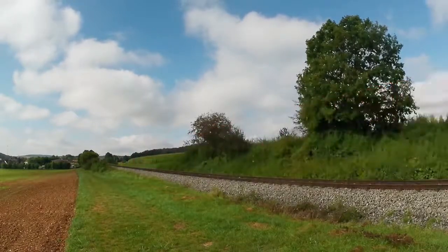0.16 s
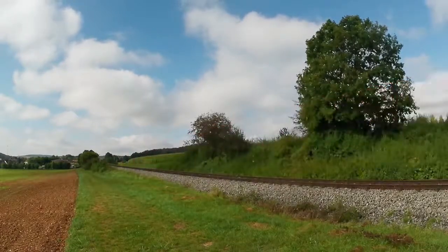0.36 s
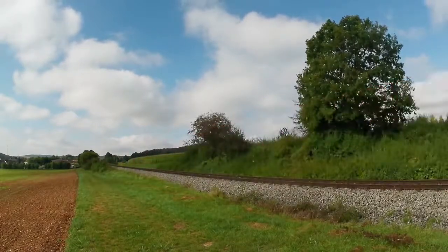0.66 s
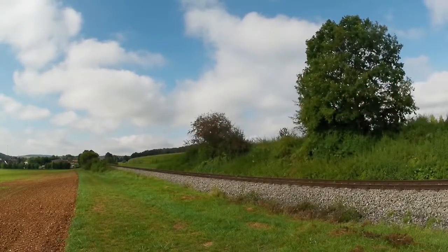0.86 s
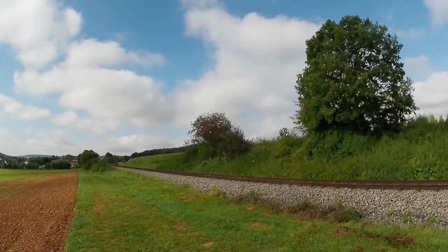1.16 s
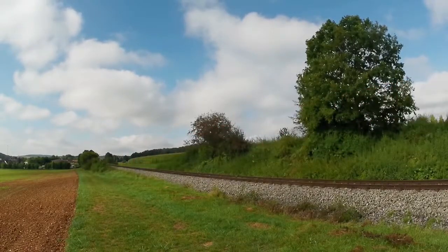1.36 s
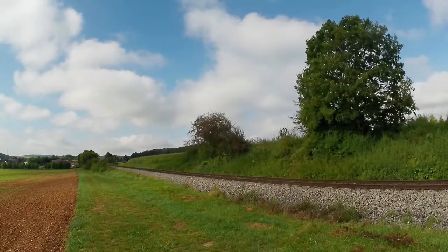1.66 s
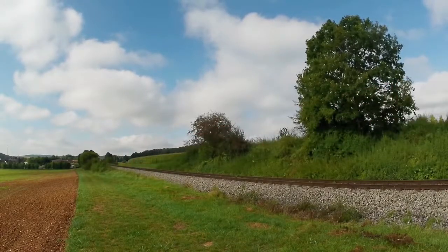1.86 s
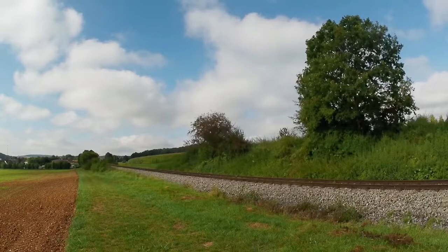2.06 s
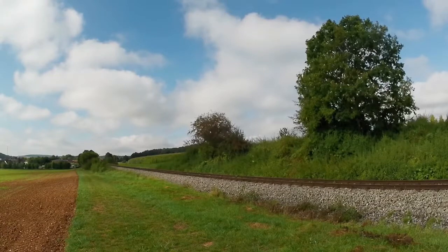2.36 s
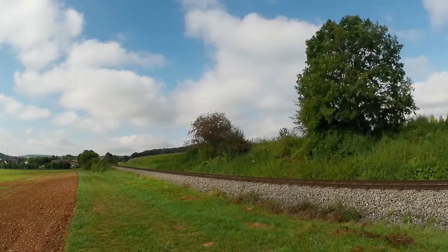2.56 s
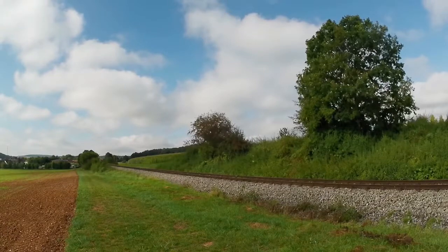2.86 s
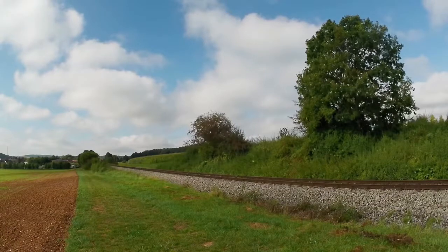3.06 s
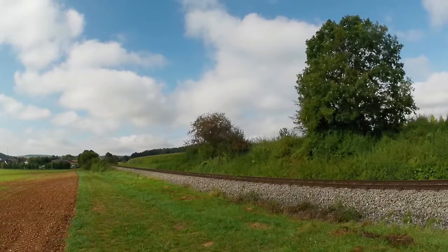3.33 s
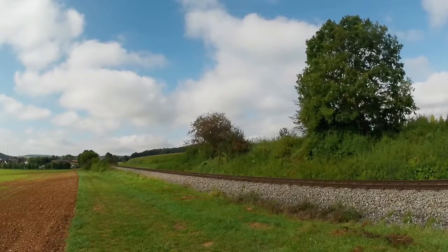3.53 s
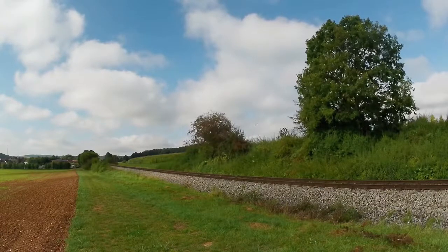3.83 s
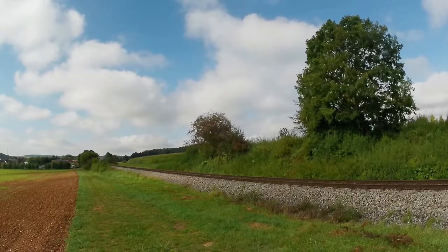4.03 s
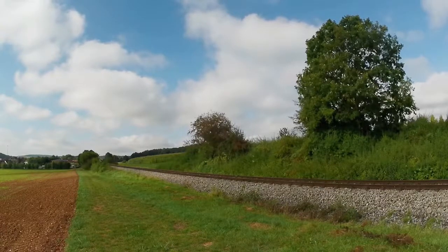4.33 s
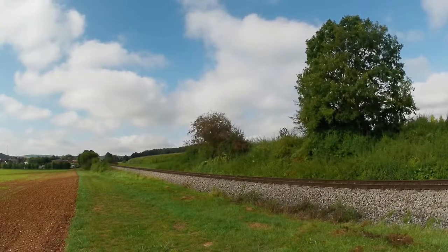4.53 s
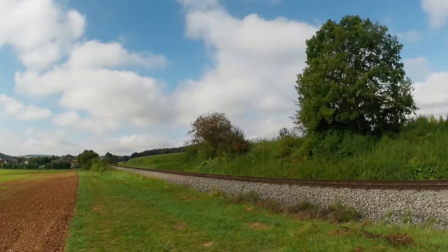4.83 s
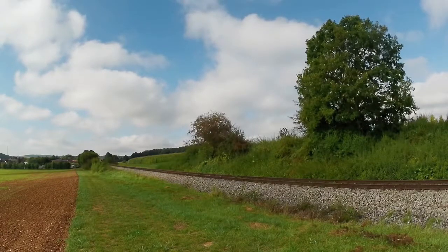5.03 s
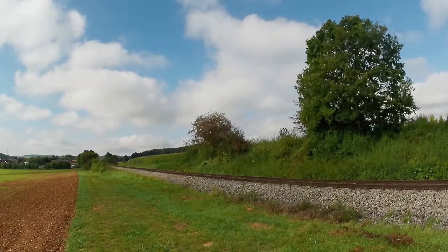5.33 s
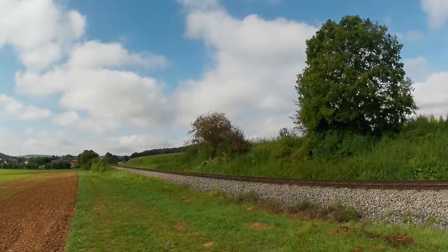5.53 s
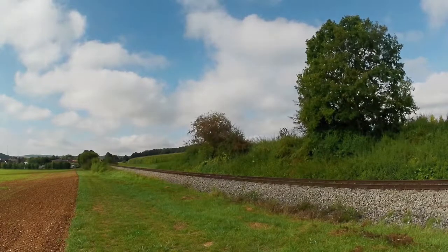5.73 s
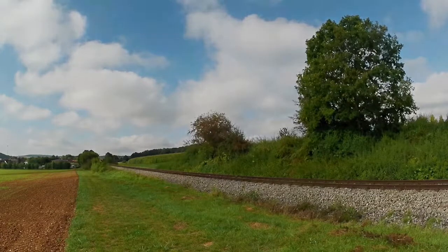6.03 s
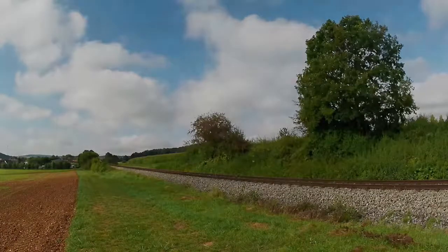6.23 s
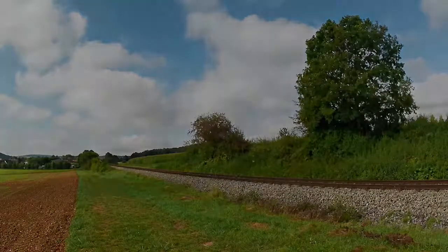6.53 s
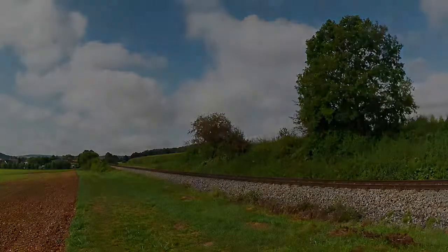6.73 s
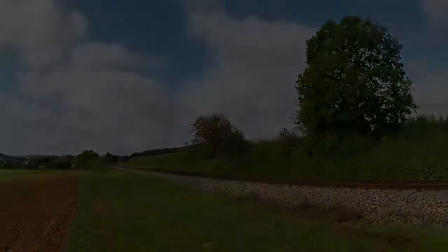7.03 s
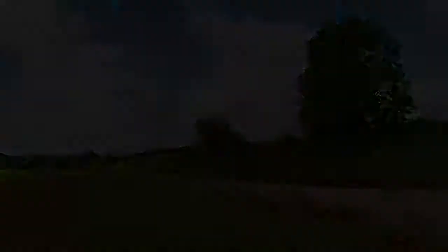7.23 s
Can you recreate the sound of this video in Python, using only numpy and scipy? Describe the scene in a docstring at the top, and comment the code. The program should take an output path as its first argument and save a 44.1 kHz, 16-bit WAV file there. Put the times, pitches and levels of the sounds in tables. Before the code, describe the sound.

The sound starts at its loudest, with a railbus already moving away: deep engine hum, coach rumble, steel-on-steel roar and bright hiss. Thuds cluster at the start and soon become rare and weak. Wheels sing unsteadily in brief swells, and stirred grass whispers around one second. The hiss dulls first, the drone and rail sound linger, then only soft air and light wind remain. Mono, dry, open farmland beside the track.

```python
"""The exhaust of a diesel railbus drones, built from waves locked to its firing; it has just passed and draws away.
Its wheels roar, hiss and ring: coloured noise and narrow ringing tones, fading with distance at their own rates.
Rough spots thump, lighter clanks and tiny ticks follow: short clicks set tones ringing or shape bursts of noise.
Coach rumble, stirred grass, buffeting wind, a light breeze, open fields and thin air are coloured noise."""
import sys
import numpy as np
from scipy import signal
from scipy.fft import rfft, irfft, next_fast_len
from scipy.io import wavfile

SR = 44100
rng = np.random.default_rng(int(sys.argv[2]) if len(sys.argv) > 2 else 0)


def wrap_up_sound(samples):
    """Save the sound to the file named by the first command line argument, as 16-bit audio."""
    columns = np.atleast_2d(samples).T
    # keep every value between -1 and 1, then stretch to whole-number steps
    tamed = np.clip(columns, -1, 1)
    steps = np.round(tamed * 32767).astype(np.int16)
    wavfile.write(sys.argv[1], SR, steps)


N = 325899
TIME = np.arange(N) / SR  # seconds

# Colour of the thin air noise: (frequency [Hz], level per Hz [dB])
AIR_COLOUR = [(1500, -10), (5000, -4.5), (8000, 2), (11000, 1.5), (16000, 2.5)]
# Colour of the far wash of open country: (frequency [Hz], level per Hz [dB])
FIELDS_COLOUR = [(150, -8), (330, 2), (500, 1.5), (750, 1), (1050, -2.5), (1400, -5), (1650, -3.5),
                 (1950, -16), (2150, -13.5), (2700, -16), (4000, -23)]
# Colour of the breeze's rumble: (frequency [Hz], level per Hz [dB])
BREEZE_COLOUR = [(40, 2.5), (75, 3.5), (115, 0.5), (170, -0.5), (240, -2), (310, -8.5), (450, -23),
                 (900, -60)]
# Gusts of breeze, before a shared lift: (time [s], half length [s], level [dB])
GUSTS = [(3.4, 0.11, -50), (5.7, 0.56, -59), (6.254, 0.13, -54.5), (6.908, 0.1, -55), (7.19, .22, -58)]
# Colour of the wind buffeting the microphone: (frequency [Hz], level per Hz [dB])
BUFFET_COLOUR = [(4, -9.5), (12, -5), (22, -3), (33, -4), (45, -8), (70, -15.5), (120, -20.5), (300, -59)]
# Loudness of the grass stirred by the slipstream: (time [s], level [dB])
GRASS_LEVEL = [(0, -78), (.7, -73), (1.12, -66.5), (1.3, -75), (1.6, -73), (2.2, -81), (4, -105)]
# Colour of the stirred grass: (frequency [Hz], level per Hz [dB])
GRASS_COLOUR = [(4000, -13), (7500, -3.5), (9600, -5), (11000, -9), (14000, -20)]
# Small sharp ticks, before filtering: (time [s], strength [dB])
TICKS = [(.4103, -45), (.4188, -57)]
# Colour of the ticks, before the low cut: (frequency [Hz], level per Hz [dB])
TICK_COLOUR = [(9000, -30), (11000, -7), (12200, -6), (13900, -2), (15500, -6), (17000, -20)]
# Coach rumble close by, and further off: (frequency [Hz], level per Hz [dB])
RUMBLE_NEAR = [(40, 5), (70, 7), (110, -13), (170, 1.5), (235, -4), (305, -13), (450, -16.5), (900, -59)]
RUMBLE_FAR = [(40, -7), (65, 3), (85, 11.5), (125, 3), (170, 3), (230, -4), (300, -12), (450, -28.5),
              (900, -70)]
# Wheel knocks on rough spots, before the soft contact: (time [s], strength [dB])
KNOCKS = [(.048, -18), (.128, -14), (.219, -17.5), (.263, -20.5), (.397, -15), (0.567, -18), (0.749, -24),
          (0.931, -25.5), (1.09, -27), (1.731, -35), (2.36, -37), (2.699, -36)]
# Tones a knock rings with: (frequency [Hz], strength [dB], time to fall 60 dB [s])
BOGIE_MODES = [(165, 3.5, 0.035), (192.5, -10, 0.044), (248, -19, 0.036)]
# Light clanks of a wheel, before the brief contact: (time [s], strength [dB])
CLANKS = [(.66, -27.5), (2.426, -40), (2.685, -46)]
# Wheel tones that sing out: (frequency [Hz], nominal width [Hz], strength [dB])
WHEEL_MODES = [(368.6, 10, -7), (596.4, 23, -5), (838, 21, 1.5), (958, 34, -5), (1058, 12, -16),
               (1220, 17.5, -6.5)]
# Brief swells of the wheels' ringing, and one dip: (time [s], change from usual level [dB])
FLARES = [(.18, 9), (.67, -7), (.85, 9.5), (1.15, 5.5), (1.76, 3.5), (2.34, 7), (2.69, 6), (3.88, 2),
          (4.33, 6)]
# Colour of the wheel roar near and far, before resonances: (frequency [Hz], level per Hz [dB])
ROAR_NEAR = [(180, -27), (300, -9), (450, -2.5), (700, 0.5), (1150, -1), (1400, -7), (1700, -6),
             (2000, -13), (2600, -16), (3400, -44), (5000, -44)]
ROAR_FAR = [(180, -19), (300, 0), (430, -4), (850, 0.5), (1150, -3), (1380, -10.5), (1680, -5), (1950, -12),
            (2500, -15.5), (3200, -31), (5000, -52)]
# Broad rail and coach resonances: (frequency [Hz], width [Hz], lift when near [dB], lift when far [dB])
RAIL_MODES = [(587, 44, 3.5, -1), (708, 39, 4, -1), (772, 21, -2, 7), (1220, 34, 7, 5), (1557, 100, 3, 2.5),
              (1804, 100, 0, 6), (2174, 92, 8, 7.5), (2350, 130, 4.5, 4.5)]
# Colour of the wheel hiss near and far: (frequency [Hz], level per Hz [dB])
HISS_NEAR = [(1800, -20), (2700, 1), (3200, 1), (3700, -4), (4000, -2.5), (4500, -7.5), (5000, -3.5),
             (5600, -8), (6500, -15), (9000, -22), (11500, -31), (16000, -43)]
HISS_FAR = [(1800, -15.5), (2700, 0.5), (3200, -2), (4000, -1), (5100, -1.5), (5700, -2), (6250, -6.5),
            (6550, -4.5), (7200, -16.5), (8500, -36), (16000, -58)]
# Engine firing: (time [s], firings per second [Hz])
FIRING = [(0, 51), (.15, 56.7), (.5, 53.2), (.72, 54.3), (3, 54.55), (7.39, 59.5)]
# Base level of the exhaust drone, before its wavering: (time [s], level [dB])
DRONE_LEVEL = [(0.04, -25), (0.29, -21), (0.66, -26), (0.73, -22.5), (1.52, -22.5), (1.88, -29.5),
               (2.21, -23), (2.95, -28), (3.23, -24), (3.63, -29), (4.14, -26.5), (4.48, -31.5),
               (5.11, -30), (5.42, -35.5), (5.85, -31), (5.95, -38), (6.15, -41), (7.39, -48.5)]
# Weaker exhaust tones: (multiple of the firing rate [ratio], level against the octave [dB])
OVERTONES = [(2.5, -17), (3, -21.5), (3.5, -29.5), (4, -26.5)]

# The run: steady speed, nearest distance to the track, moment of passing (just before the start)
SPEED_M_PER_S, TRACK_M, PASSED_S = 18.72, 9.42, -0.22
# The wake holds its level, then dies down
WAKE_DB, WAKE_HOLD_S, WAKE_FADE_DB_PER_S = -33, 2.72, 2.5
# Thin air noise: starting level and steady fade
AIR_DB, AIR_FADE_DB_PER_S = -69.5, 1.73
# Each knock also shakes the coach: strength against the knock, half length
SHAKE_DB, SHAKE_S = -18, 0.056
# Half length of a flare; share of its decibels that also changes the roar
FLARE_S, ROAR_FOLLOWS = 0.036, 0.089
# Grass soaks up a band of the ringing: centre, half width, loss at the centre
SOAK_HZ, SOAK_OCTAVES, SOAK_DB_PER_M = 538, 0.51, 0.1
# Rails carry sound best along the track: share heard at the start, time to open out
ABREAST, OPEN_OUT_S = 0.49, 2.64
# The octave comes in and hardens the drone: middle of the rise, its time scale, size of the step
OPENS_S, OPENING_S, OPENING_DB = 0.679, 0.029, 8
CUTOFF_HZ = 15700


def from_db(db):
    """Turn decibels into a gain."""
    return 10 ** (np.asarray(db) / 20)


def rms_one(x):
    """Scale a signal to unit power."""
    return x / np.sqrt(np.mean(x ** 2) + 1e-20)


def in_time(rows):
    """Draw straight lines between table rows, giving each column at every sample."""
    seconds, *columns = np.transpose(rows)
    return [np.interp(TIME, seconds, column) for column in columns]


def drift(rate):
    """Smooth random wandering with a spread of 1, about rate times a second."""
    hz = np.fft.rfftfreq(N, 1 / SR)
    slow_spectrum = rfft(rng.standard_normal(N)) / (1 + (hz / rate) ** 4)
    return rms_one(irfft(slow_spectrum, N))


def swell(s, half_s):
    """A smooth rise and fall of height 1 around a moment."""
    return np.exp(-((TIME - s) / half_s) ** 2)


def noise(spectrum, resonances=()):
    """Unit-power noise with a smooth colour, lifted at each (frequency, width, lift) resonance."""
    size = next_fast_len(N)
    hz = np.fft.rfftfreq(size, 1 / SR) + 1e-3  # keeps the logarithm finite
    points_hz, points_db = np.transpose(spectrum)
    colour_db = np.interp(np.log(hz), np.log(points_hz), points_db, left=-120, right=-120)
    for centre, width, lift in resonances:
        colour_db = colour_db + lift / (1 + (2 * (hz - centre) / width) ** 2)
    coloured = rfft(rng.standard_normal(size)) * from_db(colour_db)
    return rms_one(irfft(coloured, size)[:N])


def ring(clicks, hz, t60):
    """A unit click starts a sine of about height 1, which falls 60 dB in t60 seconds."""
    shrink = from_db(-60 / (t60 * SR))  # per sample
    turn = 2 * np.pi * min(hz, SR / 2 - 1) / SR
    feedback = [1, -2 * shrink * np.cos(turn), shrink * shrink]
    return signal.lfilter([0, np.sin(turn)], feedback, clicks + 1e-18)


def strikes(events):
    """Place one click for each (time, strength) row."""
    out = np.zeros(N)
    for s, db in events:
        out[round(s * SR)] = from_db(db)
    return out


def distance():
    """Metres from the microphone to the railbus, running along a straight track."""
    return np.hypot(TRACK_M, SPEED_M_PER_S * (TIME - PASSED_S))


def away(level_db, doubling_db, per_100m_db):
    """Gain with distance: level abreast, loss per doubling of distance, loss along the ground."""
    doublings = np.log2(distance() / TRACK_M)
    hectometres = (distance() - TRACK_M) / 100
    return from_db(level_db - doubling_db * doublings - per_100m_db * hectometres)


def recede(near, far, half_s):
    """Blend from the near colour to the far one at constant power, half way at half_s seconds."""
    nearness = 1 / (1 + (TIME / half_s) ** 3)
    return np.sqrt(nearness) * near + np.sqrt(1 - nearness) * far


def flaring():
    """Change in decibels of the wheels' ringing during each flare or dip."""
    return sum(db * swell(s, FLARE_S) for s, db in FLARES)


def air():
    """A thin, even hiss of noise that slowly fades."""
    return from_db(AIR_DB - AIR_FADE_DB_PER_S * TIME) * noise(AIR_COLOUR)


def fields(level_db=-66.5):
    """The steady far wash of open country, as noise of constant level."""
    return from_db(level_db) * noise(FIELDS_COLOUR)


def breeze(gust_db=1.0):
    """Light gusts of wind, each a smooth swell of low noise."""
    gusts = sum(from_db(db + gust_db) * swell(s, half_s) for s, half_s, db in GUSTS)
    return noise(BREEZE_COLOUR) * gusts


def wake_buffet(lumpy_db=2.5):
    """Stirred air buffets the microphone as slow, lumpy noise, then dies down."""
    wake_db = WAKE_DB - WAKE_FADE_DB_PER_S * np.maximum(TIME - WAKE_HOLD_S, 0)
    return from_db(wake_db + lumpy_db * drift(4.1)) * noise(BUFFET_COLOUR)


def grass():
    """Grass stirred in the wake of the coach rustles softly, as bright noise."""
    level_db, = in_time(GRASS_LEVEL)
    return from_db(level_db) * noise(GRASS_COLOUR)


def ticks(crack_s=.0009, tail_s=.007, tail_db=-15, low_hz=9500):
    """A tiny bright tick and its rebound, each a crack of noise with a short, dying tail."""
    clicks = strikes(TICKS) + 1e-18
    crack = signal.lfilter([1], [1, -np.exp(-1 / (crack_s * SR))], clicks)
    tail = signal.lfilter([1], [1, -np.exp(-1 / (tail_s * SR))], clicks)
    bursts = (crack + from_db(tail_db) * tail) * noise(TICK_COLOUR)
    low_cut = signal.butter(2, low_hz, "high", fs=SR, output="sos")
    return signal.sosfilt(low_cut, bursts)


def coach_rumble(near_db=0.0, far_db=4.0, lumpy_db=2.37):
    """The rolling coach makes a lumpy low rumble, and each knock shakes it briefly."""
    shaking = sum(from_db(db) * swell(s + SHAKE_S / 2, SHAKE_S) for s, db in KNOCKS)
    rolling = away(level_db=-27.0, doubling_db=7.0, per_100m_db=11) * from_db(lumpy_db * drift(10))
    near = from_db(near_db) * noise(RUMBLE_NEAR)
    far = from_db(far_db) * noise(RUMBLE_FAR)
    # rolling and shaking add in power
    return recede(near, far, half_s=0.92) * np.hypot(rolling, from_db(SHAKE_DB) * shaking)


def clanks(clank_db=-4.5, contact_hz=1700):
    """A brief contact strikes the wheel tones; the wider a tone, the faster it dies."""
    soften = signal.butter(2, contact_hz, fs=SR, output="sos")
    clicks = signal.sosfilt(soften, strikes(CLANKS) + 1e-18)
    out = np.zeros(N)
    for hz, width, db in WHEEL_MODES:
        t60 = np.log(1000) / (np.pi * width)
        out += from_db(db + clank_db) * ring(clicks, hz, t60)
    return out


def knocks(knock_db=-0.5, contact_hz=350):
    """Rough spots thump the bogie (the wheel frame) through a soft contact, and it rings."""
    soften = signal.butter(2, contact_hz, fs=SR, output="sos")
    clicks = signal.sosfilt(soften, strikes(KNOCKS))
    return sum(from_db(db + knock_db) * ring(clicks, hz, t60) for hz, db, t60 in BOGIE_MODES)


def wheel_ring(swell_db=2.54, turn_hz=5.4, throb=0.18, rise_s=0.85, gone_s=4.9):
    """Narrow wheel tones swell at random, throb once a turn and flare; they carry best along the track."""
    out = np.zeros(N)
    for hz, width, db in WHEEL_MODES:
        # noise through two resonators gives a narrow, unsteady tone
        tone = ring(ring(rng.standard_normal(N), hz, 1 / width), hz, 1 / width)
        octaves_off = np.log2(hz / SOAK_HZ)
        soak_db = SOAK_DB_PER_M * distance() * np.exp(-(octaves_off / SOAK_OCTAVES) ** 2)
        out += from_db(db - soak_db + swell_db * drift(2.5)) * rms_one(tone)
    turning = 1 + throb * np.sin(2 * np.pi * turn_hz * TIME + rng.uniform(0, 2 * np.pi))
    opening_out = 1 - .5 * np.exp(-(TIME / rise_s) ** 2)
    carry = opening_out / (1 + (TIME / gone_s) ** 10)  # down to half around gone_s, then quickly lost
    fading = away(level_db=-43.5, doubling_db=0.0, per_100m_db=27.5)
    return out * turning * carry * from_db(flaring()) * fading


def wheels(flutter_db=1.16, shimmer_db=0.82):
    """Rough steel on steel roars and hisses: wheel sound dies quickly, rail sound lingers."""
    modes = np.array(RAIL_MODES)
    near_modes = modes[:, :-1]
    far_modes = np.delete(modes, 2, axis=1)  # drops the near lift
    carry = 1 - (1 - ABREAST) * np.exp(-(TIME / OPEN_OUT_S) ** 2)
    roar = noise(ROAR_NEAR, near_modes) * away(level_db=-28.5, doubling_db=0.57, per_100m_db=67.5)
    roar += noise(ROAR_FAR, far_modes) * carry * away(level_db=-36.5, doubling_db=0.04, per_100m_db=26)
    hiss = noise(HISS_NEAR) * away(level_db=-37.5, doubling_db=2.5, per_100m_db=63.5)
    hiss += noise(HISS_FAR) * carry * away(level_db=-48.5, doubling_db=.5, per_100m_db=24)
    flutter = from_db(ROAR_FOLLOWS * flaring() + flutter_db * drift(22))
    shimmer = from_db(shimmer_db * drift(12))
    return roar * flutter + hiss * shimmer


def exhaust(firing_db=0.0, lope_db=-22, upper_lope_db=-20, waver_db=0.8, octave_waver_db=1.0,
            uneven_db=2, jitter=0.042):
    """Firing tone and octave; unequal cylinders add a lope at half the rate and wavering tones between."""
    rate, = in_time(FIRING)
    tone_db, = in_time(DRONE_LEVEL)
    phase = 2 * np.pi * np.cumsum(rate) / SR + jitter * drift(6.8)  # jitter in radians
    closed = .5 - .5 * np.tanh((TIME - OPENS_S) / OPENING_S)  # falls from 1 to 0
    octave = away(level_db=-23.5, doubling_db=-0.2, per_100m_db=30.5)
    octave = octave * from_db(octave_waver_db * drift(4.8) - OPENING_DB * closed)
    out = from_db(tone_db + firing_db + waver_db * drift(30)) * np.cos(phase)
    out += from_db(tone_db + lope_db + uneven_db * drift(3)) * np.cos(phase / 2)
    out += from_db(tone_db + upper_lope_db + uneven_db * drift(8)) * np.sin(1.5 * phase)
    out += octave * np.cos(2 * phase)
    for multiple, db in OVERTONES:
        overtone_phase = multiple * phase + rng.uniform(0, 2 * np.pi)
        out += octave * from_db(db + uneven_db * drift(11)) * np.cos(overtone_phase)
    return np.sqrt(2) * out  # so that the levels above are average (rms) levels


def scene():
    """Add everything in the open air, on one microphone."""
    background = air() + fields() + breeze() + wake_buffet() + grass() + ticks()
    railbus = coach_rumble() + clanks() + knocks() + wheel_ring() + wheels() + exhaust()
    return (background + railbus)[None]


def record(dry):
    """Cut the very top of the treble steeply."""
    top_cut = signal.ellip(12, .1, 80, CUTOFF_HZ, fs=SR, output="sos")
    return signal.sosfilt(top_cut, dry)


dry = scene()
out = record(dry)
wrap_up_sound(out)
```